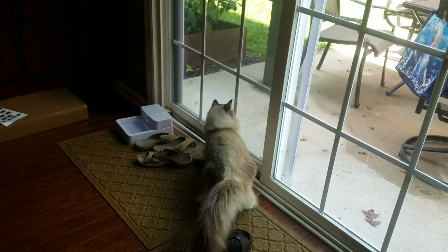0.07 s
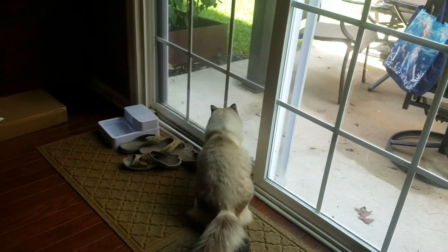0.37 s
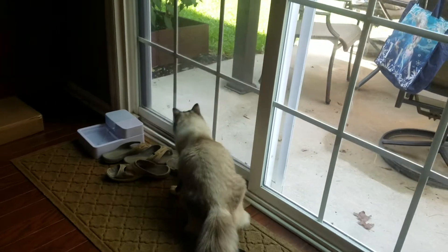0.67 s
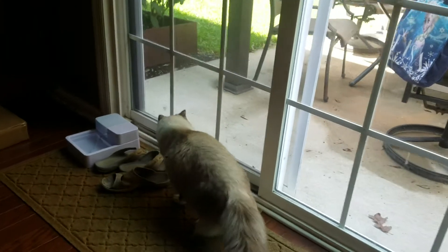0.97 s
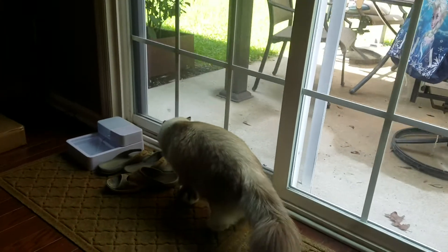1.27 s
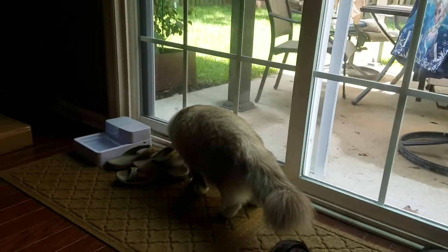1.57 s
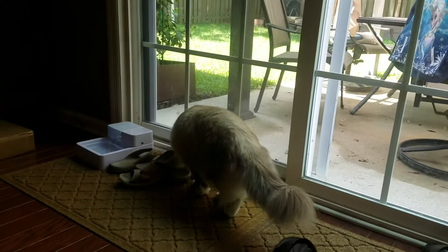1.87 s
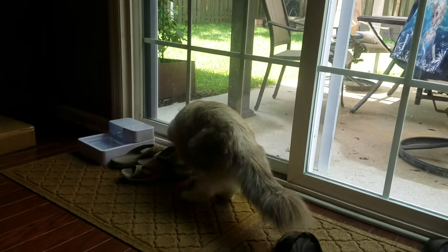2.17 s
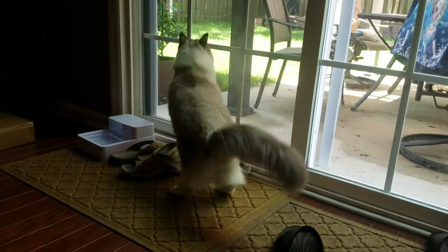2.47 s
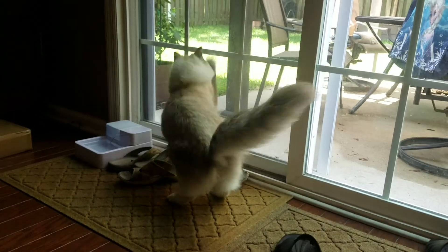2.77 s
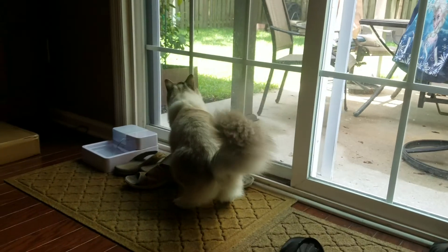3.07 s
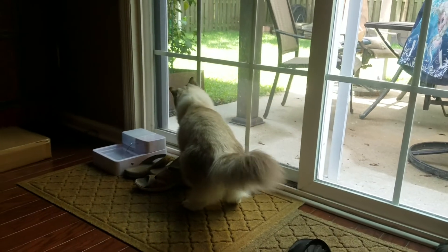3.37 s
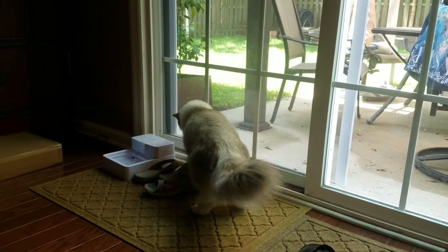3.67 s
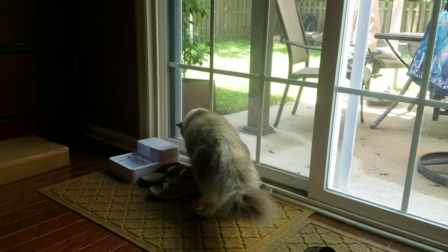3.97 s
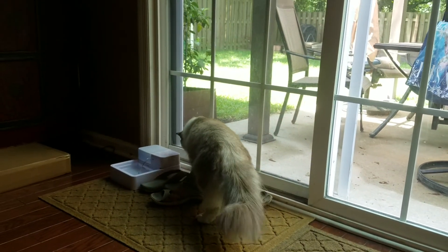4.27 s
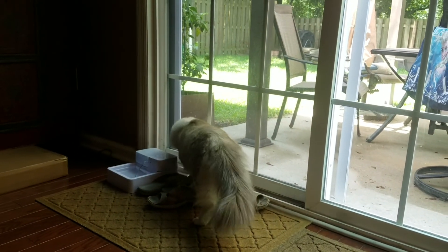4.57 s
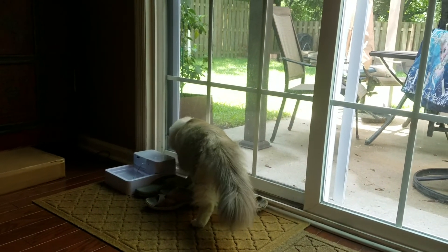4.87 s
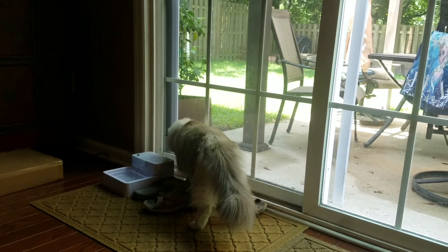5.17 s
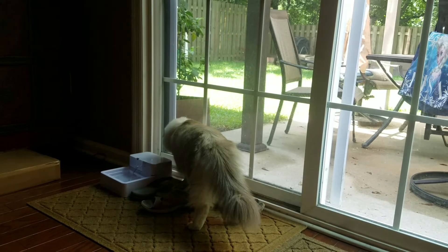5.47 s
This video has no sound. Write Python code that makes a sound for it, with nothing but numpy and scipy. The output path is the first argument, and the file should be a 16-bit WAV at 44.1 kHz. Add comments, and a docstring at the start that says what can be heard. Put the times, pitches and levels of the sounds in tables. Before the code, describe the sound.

In a quiet living room, faint rustles, clicks and soft bumps come from a hand-held microphone while a cat steps on a rug and its claws tick lightly. About halfway through, the cat leaps at a sliding glass door: two quick thumps ring the pane and rattle the frame, followed by one lighter knock. A soft step and a few tiny ticks follow, over low room tone and hiss.

```python
"""A cat leaps at a sliding glass door in a quiet living room. Claws tick, pads tread and scuff the rug.
Paws ring the glass modes, bow the pane and rattle the frame; seal friction stops the swing.
One more paw knocks as the cat drops back. Near walls echo the glass; the room answers each blow.
Around it, mostly shaped noise: room tone, hiss, rumble, rustle, clicks and bumps of a hand-held
camera, a few sine tinks, and a soft far rush at the end."""
import sys
import numpy as np
from scipy import signal
from scipy.fft import rfft, irfft, next_fast_len
from scipy.io import wavfile
from scipy.ndimage import uniform_filter1d

SR = 44100
rng = np.random.default_rng(int(sys.argv[2]) if len(sys.argv) > 2 else 0)


def store_wav(level_fs):
    """Save 16-bit WAV to argv[1]."""
    pcm = np.round(np.clip(np.atleast_2d(level_fs), -1, 1) * 32767)
    wavfile.write(sys.argv[1], SR, pcm.T.astype(np.int16))


N = 252693

# left-right likeness of noise: (frequency [Hz], correlation [0..1])
STEREO_CORRELATION = [(60, 0.89), (300, 0.85), (600, 0.6), (1200, 0.068), (3000, 0.036), (10000, 0.014)]
# noise spectra: (frequency [Hz], relative density [dB])
ROOM_TONE_SPECTRUM = [(25, -13), (48, -1.5), (85, -12.5), (128, -1), (165, -13), (260, -1), (450, -2),
                      (690, -9), (820, -7.5), (1100, -13), (1550, -14), (2300, -16), (4000, -22),
                      (8000, -34.5)]
MIC_HISS_SPECTRUM = [(2000, -35), (6000, -8), (9500, -8), (12000, -2.5), (14000, -0.5), (16500, 1.5)]
RUMBLE_SPECTRUM = [(20, -31), (42, 1), (70, -2), (130, -6.5), (230, -3), (320, -18), (600, -20),
                   (1500, -27.5)]
RUSTLE_SPECTRUM = [(800, -26), (2000, 1.5), (4500, -3.5), (7000, -8), (11000, -3), (15500, 0)]
CLATTER_SPECTRUM = [(260, -13), (400, 10), (680, 3), (900, -1.5), (1450, -1), (2200, 0.5), (2800, -5),
                    (4100, -3), (5400, -9.5), (7000, -16.5), (11000, -10.5), (16000, -9)]
RUSH_SPECTRUM = [(130, -15), (260, -1), (400, -1.5), (490, 3), (660, -9.5), (800, -4), (1100, -18),
                 (2500, -31.5)]
# handling rumble: (time [s], level [dB])
RUMBLE_ENVELOPE = [(0, -58.5), (.78, -58), (1.25, -72.5), (1.95, -73), (2.12, -67.5), (3.1, -78),
                   (5.73, -76)]
# hand shifts on the camera: (time [s], relative level [dB], t60 [s])
HAND_SHIFTS = [(0, -75, 2), (.07, -67, 0.47), (.545, -67.5, .7), (.657, -64.5, .5), (.74, -65.5, 1.4),
               (1.26, -64, 0.91), (1.405, -67.5, 1.2), (1.68, -73, 2.7), (1.84, -69.5, 2.4),
               (2.16, -69.5, 0.32), (2.55, -67.5, 3.2), (2.76, -68.5, 2.7), (3.505, -63, 0.27),
               (4.19, -72, .2), (4.49, -71, 0.67), (4.74, -67.5, .25), (4.82, -69, 0.72), (5.02, -76, 1.2)]
# camera clicks and bumps: (time [s], level [dB])
CASING_CLICKS = [(0.1103, -57), (.491, -63), (1.003, -67), (2.0876, -59), (2.17, -62), (3.921, -69)]
CAMERA_BUMPS = [(.576, -46), (.678, -51), (.724, -57)]
# claws on the sill: (time [s], level [dB], centre [Hz])
CLAW_TICKS = [(.5758, -54.5, 2000), (.81, -57, 3800), (1.423, -50, 2500), (1.792, -66, 3500)]
# paws on the rug: (time [s], level [dB], centre [Hz], t60 [s])
PAW_SCUFFS = [(.683, -59, 3780, 0.21), (.686, -62, 6300, .12), (1.443, -69, 8300, 0.11)]
PAW_TREADS = [(1.4245, -51, 560, .018), (2.016, -56, 485, .2), (2.08, -61, 322, .18),
              (2.885, -55, 298, .069)]
# small hard things: (time [s], peak [dB], frequency [Hz], t60 [s])
OBJECT_TINKS = [(0.7923, -53, 2560, 0.025), (2.8827, -53.5, 4230, 0.018), (3.2176, -60, 3840, .012),
                (5.709, -63.5, 4660, .02)]
# paws on the door: (time [s], contact [s], ring level [dB], centre of struck modes [Hz],
# spread [octaves], friction stop [s], clatter level [dB], clatter cutoff [Hz])
DOOR_BLOWS = [(2.3891, 0.0011, -37, 2010, 0.35, 0.023, -39, 11000),
              (2.3935, 0.00293, -35.5, 447, 0.2, .13, -36, 2800),
              (2.3955, 0.00098, -39.5, 1060, 0.32, 0.031, -37.5, 3000),
              (2.4890, 0.00094, -47.5, 720, 0.46, 0.2, -41, 6000),
              (2.4900, .003, -33.5, 835, .15, .21, -44, 4000),
              (2.4937, .001, -41.5, 2130, 0.8, .15, -29.5, 7800),
              (2.4970, .005, -30, 310, .16, .026, -37, 6500), (2.5015, .01, -28.5, 335, .6, .25, -40, 4000),
              (2.7368, 0.00091, -36.5, 1010, .19, 0.017, -45.5, 1600)]
# glass and frame: (frequency [Hz], relative level [dB], t60 [s])
DOOR_MODES = [(236, -12, .25), (258, -7, .55), (294, -2, .22), (317, 0, .38), (352, -11, .25),
              (377, -7, .42), (418, -9, .22), (452, -9, .18), (502, -7, .22), (526, -4, .45),
              (560, -12, .15), (758, -11, .17), (794, -6, .5), (825, -2, .22), (883, -4, .4), (975, -9, .1),
              (1082, -6, .3), (1114, -3, .07), (1151, -6, .22), (1370, -11, .4), (1852, -8, .1),
              (2015, -12, .35), (2229, -8, .18), (2961, -14, .35)]
# whole-pane flexing: (frequency [Hz], level [dB], t60 [s])
PANE_MODES = [(60, -44, 1), (77.8, -46.5, 1), (108, -46.5, 0.73), (124, -34.5, 0.12), (155, -48.5, 0.47)]
# near walls: (delay [s], relative left gain [dB], relative right gain [dB])
WALL_ECHOES = [(0.0107, -36, -34), (.0138, -27, -7.5), (.0258, -10, -9), (.0375, -12, -6)]
# room decay: (frequency [Hz], t60 [s])
ROOM_T60 = [(80, 0.75), (300, 0.49), (1000, 0.66), (4000, 0.52), (8000, 0.55), (15000, 0.36)]


def amp(db):
    """Decibels to gain."""
    return 10 ** (np.asarray(db) / 20)


def unit(x):
    """Scale to rms 1."""
    return x / np.sqrt(np.mean(x ** 2) + 1e-20)


def fade(t, t60_s):
    """Exponential decay, 60 dB down at t60_s."""
    return np.exp(-np.log(1000) * t / t60_s)


def along(points, hz):
    """Interpolate (frequency [Hz], value) points on a log axis."""
    point_hz, values = np.transpose(points)
    return np.interp(np.log(hz + 1), np.log(point_hz + 1), values)


def colour(spectrum, hz):
    """Gain of a spectrum table, rolled off beyond its ends."""
    low_cut = np.minimum(1, hz / spectrum[0][0]) ** 2
    high_cut = np.minimum(1, spectrum[-1][0] / (hz + 1)) ** 2
    return amp(along(spectrum, hz)) * low_cut * high_cut


def bell(hz, centre_hz, octaves):
    """Bell of gain around centre_hz."""
    return 1 / (1 + (np.log2((hz + 1) / centre_hz) / octaves) ** 2 / 2) ** 2


def noise(response, size):
    """Stereo noise, rms 1: correlated bass, independent treble."""
    fft_size = next_fast_len(size)
    hz = np.fft.rfftfreq(fft_size, 1 / SR)
    width_rad = np.arccos(np.clip(along(STEREO_CORRELATION, hz), 0, 1)) / 2
    shaped = rfft(rng.standard_normal((2, fft_size))) * response(hz)
    mid, side = irfft(shaped * [np.cos(width_rad), np.sin(width_rad)], fft_size)[:, :size]
    return unit(np.array([mid + side, mid - side]))


def steady(spectrum):
    """Scene-long coloured noise."""
    return noise(lambda hz: colour(spectrum, hz), N)


def add(track, start_s, sound):
    """Mix a sound in at start_s."""
    part = track[:, max(0, round(start_s * SR)):][:, :sound.shape[-1]]
    part += sound[..., :part.shape[1]]


def bursts(events, octaves):
    """Decaying noise bands from (time [s], level [dB], centre [Hz], t60 [s]) rows."""
    out, t = np.zeros((2, N)), np.arange(SR // 2) / SR
    for start_s, db, centre_hz, t60_s in events:
        band = noise(lambda hz: bell(hz, centre_hz, octaves), len(t))
        add(out, start_s, amp(db) * fade(t, t60_s) * band)
    return out


def rise(t, attack_s):
    """Linear ramp, 0 to 1."""
    return np.clip(t / attack_s, 0, 1)


def noise_floor(tone_db=-63.5, hiss_db=-72.5):
    """Steady room tone and microphone hiss."""
    return amp(tone_db) * steady(ROOM_TONE_SPECTRUM) + amp(hiss_db) * steady(MIC_HISS_SPECTRUM)


def handling_rumble():
    """Low noise of the hand holding the camera."""
    times_s, db = np.transpose(RUMBLE_ENVELOPE)
    return amp(np.interp(np.arange(N) / SR, times_s, db)) * steady(RUMBLE_SPECTRUM)


def hand_rustle(gain_db=2, grain_db=2.0, rise_s=0.039):
    """The hand rubs the camera, catching and slipping; each shift rises fast, then settles."""
    t = np.arange(N) / SR
    shifts = [amp(db) * rise(t - start_s, rise_s) * fade(np.maximum(t - start_s - rise_s, 0), t60_s)
              for start_s, db, t60_s in HAND_SHIFTS]
    envelope = np.linalg.norm(shifts, axis=0)
    grains = amp(grain_db * unit(uniform_filter1d(rng.standard_normal(N), size=50)))
    return amp(gain_db) * envelope * unit(grains * steady(RUSTLE_SPECTRUM))


def casing_clicks(centre_hz=12600, t60_s=0.028):
    """The casing clicks under the fingers."""
    return bursts([(start_s, db, centre_hz, t60_s) for start_s, db in CASING_CLICKS], octaves=0.93)


def claw_ticks(t60_s=0.015):
    """Claws tick on the sill."""
    return bursts([(*tick, t60_s) for tick in CLAW_TICKS], octaves=0.71)


def camera_bumps(centre_hz=188, t60_s=0.057):
    """Dull knocks on the camera body."""
    return bursts([(start_s, db, centre_hz, t60_s) for start_s, db in CAMERA_BUMPS], octaves=0.49)


def paws_on_rug():
    """Pads land dully; scuffs brush the rug brightly."""
    return bursts(PAW_TREADS, octaves=0.4) + bursts(PAW_SCUFFS, octaves=0.33)


def tinks():
    """Small hard things ring in one brief mode each."""
    out, t = np.zeros((2, N)), np.arange(SR // 2) / SR
    for start_s, db, hz, t60_s in OBJECT_TINKS:
        add(out, start_s, amp(db) * fade(t, t60_s) * np.sin(2 * np.pi * hz * t))
    return out


def friction(t, stop_s):
    """Seal friction takes equal amplitude from every swing: linear decay."""
    return np.maximum(1 - t / stop_s, 0)


def door_ring(scatter_db=1.2):
    """Each blow rings the modes its place and softness favour, until paw and seals stop them."""
    out, t = np.zeros((2, N)), np.arange(SR) / SR
    hz, mode_db, t60_s = np.transpose(DOOR_MODES)[:, :, None]
    for start_s, contact_s, db, centre_hz, octaves, stop_s, _, _ in DOOR_BLOWS:
        struck_db = db + mode_db + scatter_db * rng.standard_normal(hz.shape)
        strength = bell(hz, centre_hz, octaves) * amp(struck_db)
        push = np.sin(np.pi / 2 * rise(t, contact_s))  # swing grows while the paw presses
        free_s = np.maximum(t - contact_s, 0)
        modes = strength * np.sin(2 * np.pi * hz * (t - contact_s)) * fade(free_s, t60_s)
        add(out, start_s, modes.sum(0) * push * friction(free_s, stop_s))
    return out


def frame_clatter(attack_s=0.0007, frame_t60_s=0.076, claw_t60_s=0.031, split_hz=6500):
    """The loose frame rattles after each blow; the bright claw click dies sooner."""
    out, t = np.zeros((2, N)), np.arange(SR // 2) / SR
    highpass = signal.butter(2, split_hz, "high", fs=SR)
    onset = 1 - np.exp(-t / attack_s)
    for start_s, *_, db, top_hz in DOOR_BLOWS:
        burst = noise(lambda hz: colour(CLATTER_SPECTRUM, hz) / np.sqrt(1 + (hz / top_hz) ** 4), len(t))
        click = signal.filtfilt(*highpass, burst)
        rattle = (burst - click) * fade(t, frame_t60_s)
        add(out, start_s, amp(db) * (rattle + click * fade(t, claw_t60_s)) * onset)
    return out


def wall_echoes(glass, band_hz=(650, 1600)):
    """Near walls reflect the midrange that the glass beams at them."""
    out = np.zeros((2, N))
    beam = signal.sosfilt(signal.butter(2, band_hz, "bandpass", fs=SR, output="sos"), glass)
    for delay_s, left_db, right_db in WALL_ECHOES:
        add(out, delay_s, amp([[left_db], [right_db]]) * beam)
    return out


def pane_flex(landing_s=2.4925, attack_s=0.0018, stop_s=0.36):
    """The cat's weight bows the pane, which swings on in its lowest modes."""
    out, t = np.zeros((2, N)), np.arange(SR) / SR
    swing = sum(amp(db) * np.sin(2 * np.pi * hz * t) * fade(t, t60_s) for hz, db, t60_s in PANE_MODES)
    add(out, landing_s, swing * (1 - np.exp(-t / attack_s)) * friction(t, stop_s))
    return out


def far_rush(start_s=5.42, rise_s=0.03, level_db=-57.5, ebb_db_per_s=16):
    """Soft distant noise: quick rise, slow ebb."""
    t = np.maximum(np.arange(N) / SR - start_s, 0)
    return rise(t, rise_s) * amp(level_db - ebb_db_per_s * t) * steady(RUSH_SPECTRUM)


def reverb(x, build_up_s=0.0066, bass_db=-9, treble_db=-4):
    """Diffuse room tail: builds up, then each frequency decays at its own rate."""
    hz, t, bands = signal.stft(noise(np.ones_like, SR), SR, nperseg=256)
    bands = bands * fade(t, along(ROOM_T60, hz)[:, None]) * (1 - np.exp(-(t / build_up_s) ** 2))
    wall_gain = amp(along([(340, bass_db), (900, -4.5), (4500, -2.8), (9000, treble_db)], hz))
    tail = signal.istft(bands * wall_gain[:, None], SR, nperseg=256)[1]
    return signal.fftconvolve(x, tail / np.linalg.norm(tail[0]), axes=1)[:, :N]


def scene(reverb_db=-4, echo_db=-1, frame_pan_db=0.8):
    """Blows and ticks in the room over the background; frame slightly right."""
    glass = door_ring()
    frame = frame_clatter() * amp([[-frame_pan_db], [frame_pan_db]])
    hits = glass + frame + casing_clicks() + camera_bumps() + paws_on_rug() + claw_ticks() + tinks()
    reflections = amp(echo_db) * wall_echoes(glass) + amp(reverb_db) * reverb(hits)
    background = hand_rustle() + noise_floor() + handling_rumble() + far_rush()
    return hits + reflections + pane_flex() + background


def record(dry, top_hz=15850):
    """Camera band limit: brick-wall low-pass."""
    size = next_fast_len(N + SR // 2)
    passband = np.fft.rfftfreq(size, 1 / SR) < top_hz
    return irfft(rfft(dry, size) * passband, size)[:, :N]


dry = scene()
out = record(dry)
store_wav(out)
```